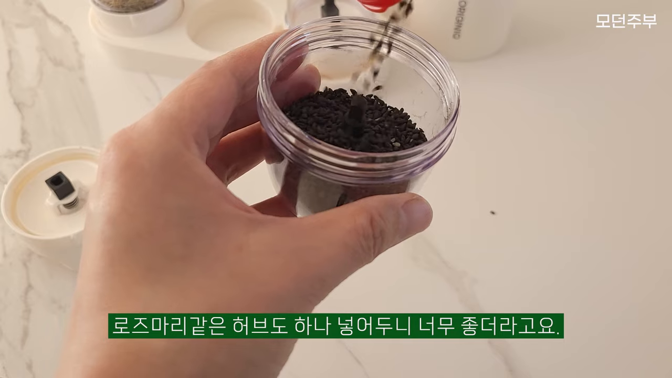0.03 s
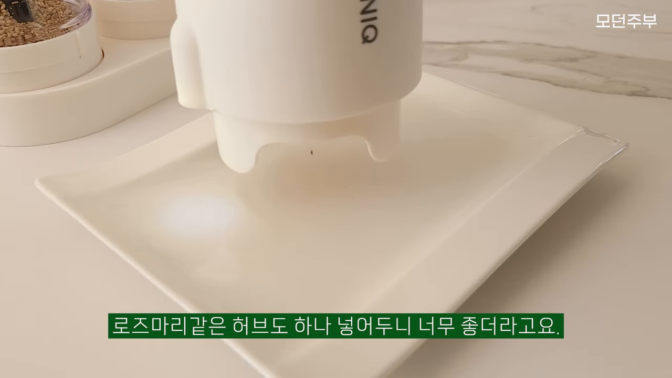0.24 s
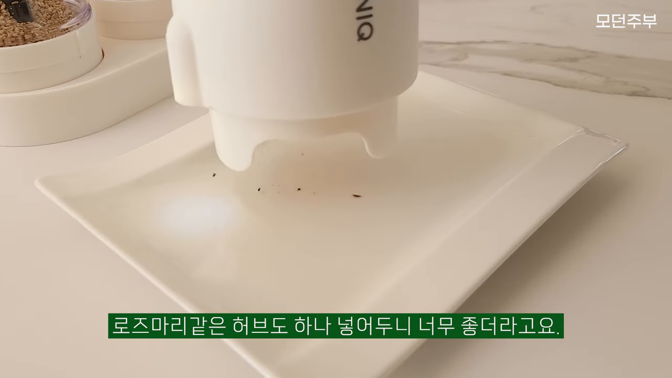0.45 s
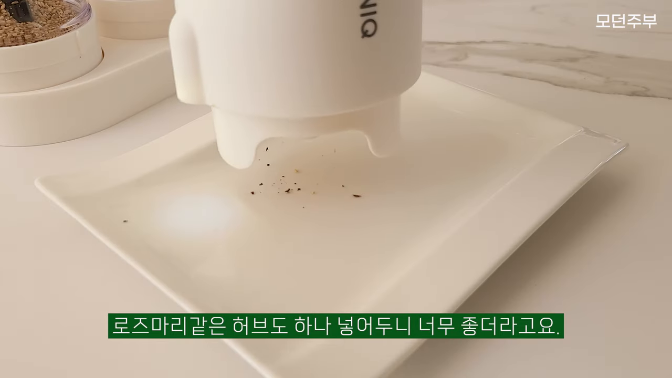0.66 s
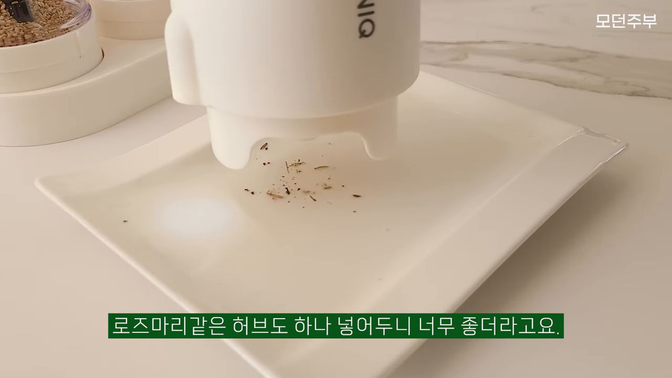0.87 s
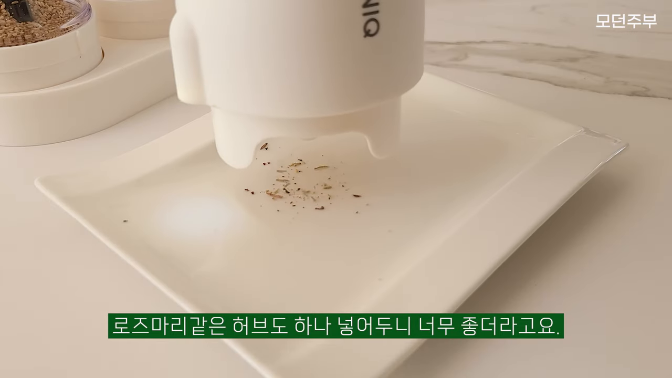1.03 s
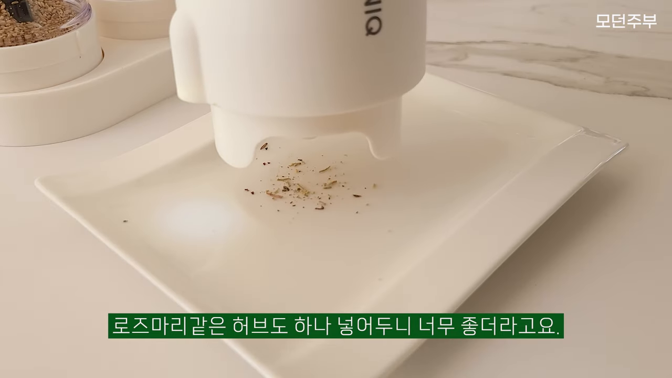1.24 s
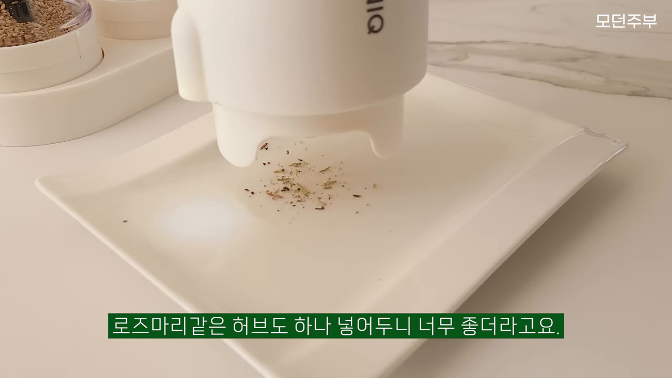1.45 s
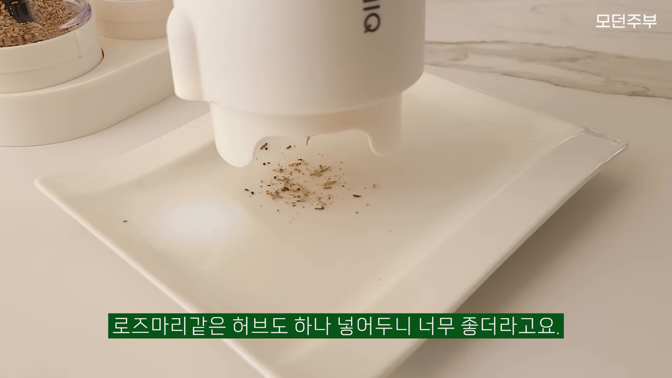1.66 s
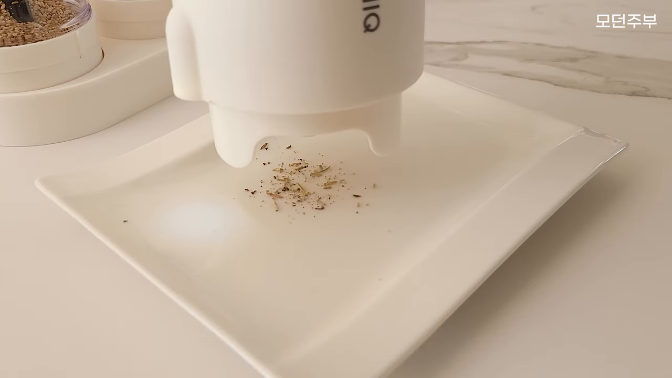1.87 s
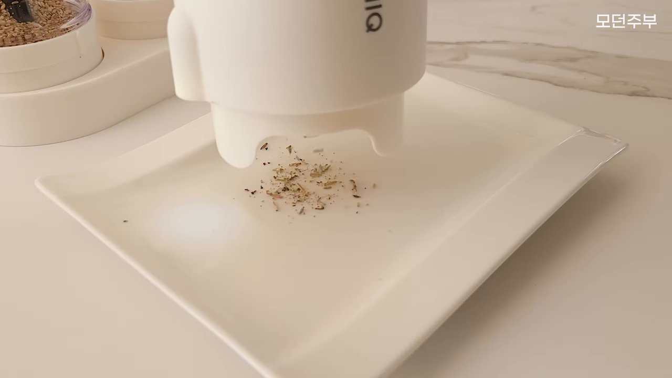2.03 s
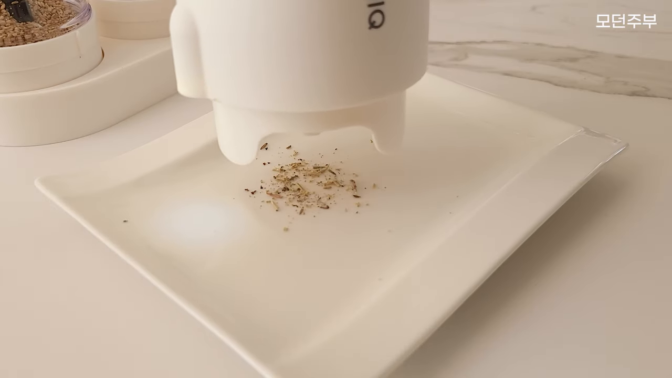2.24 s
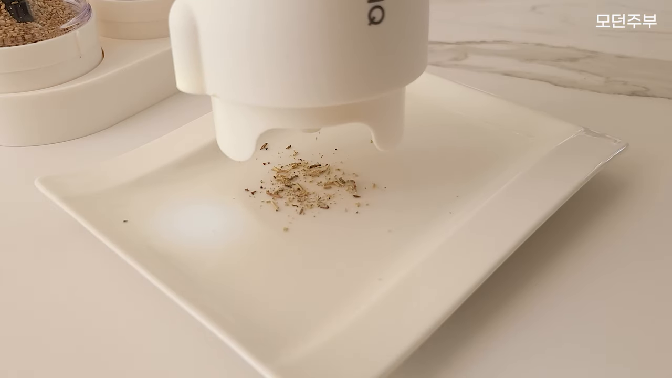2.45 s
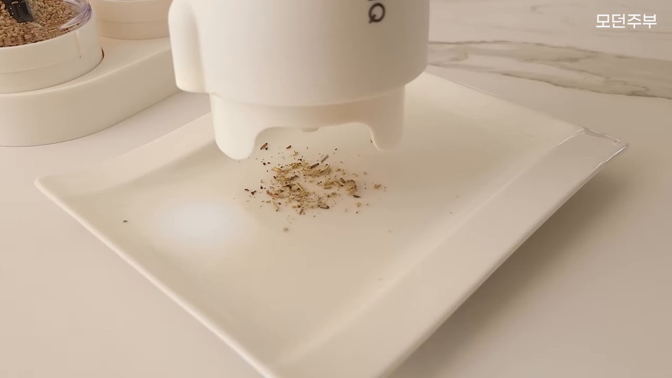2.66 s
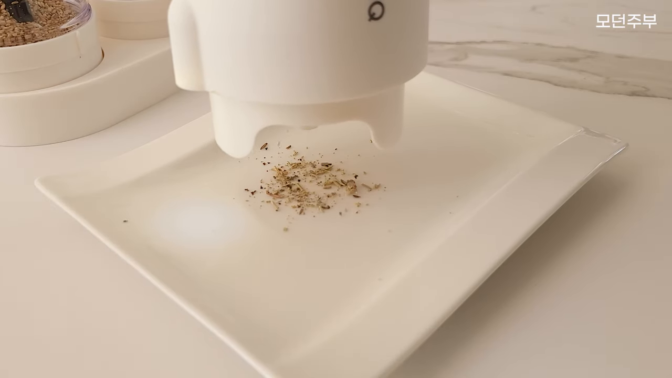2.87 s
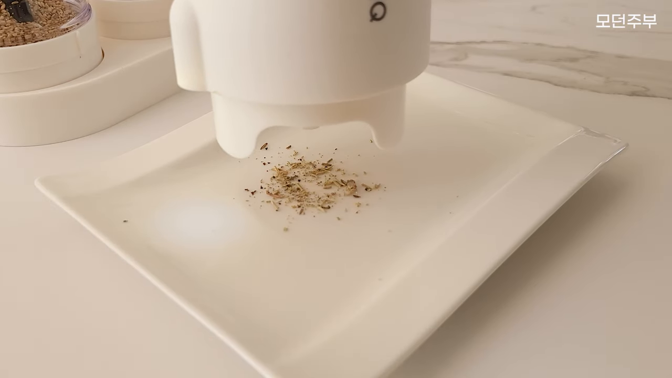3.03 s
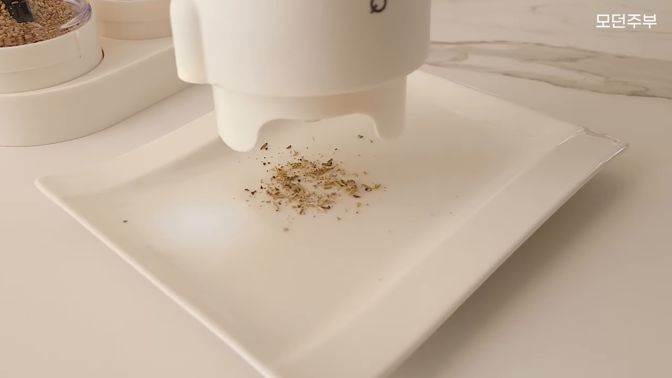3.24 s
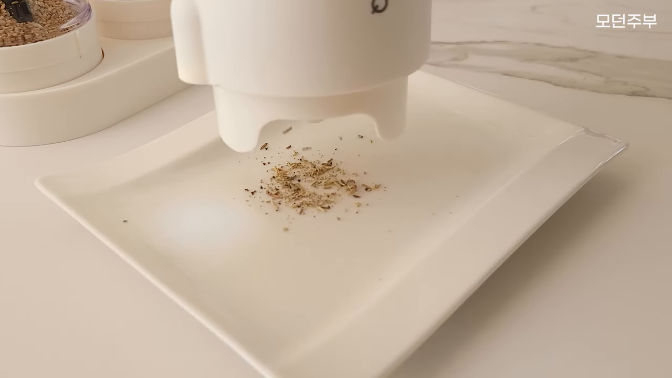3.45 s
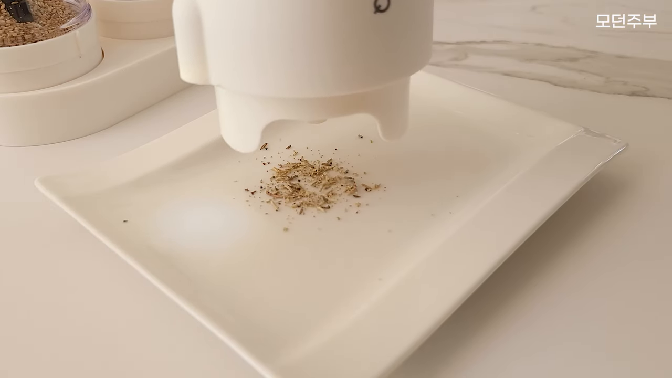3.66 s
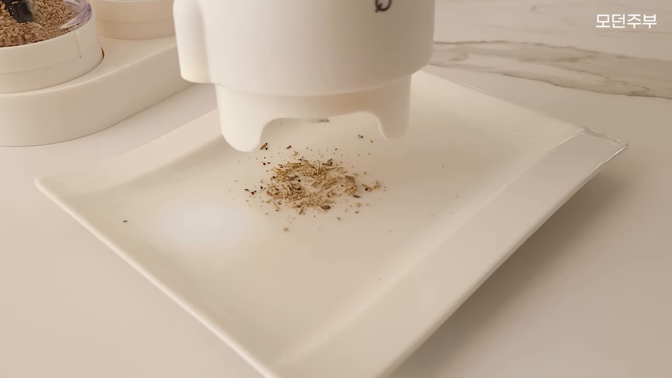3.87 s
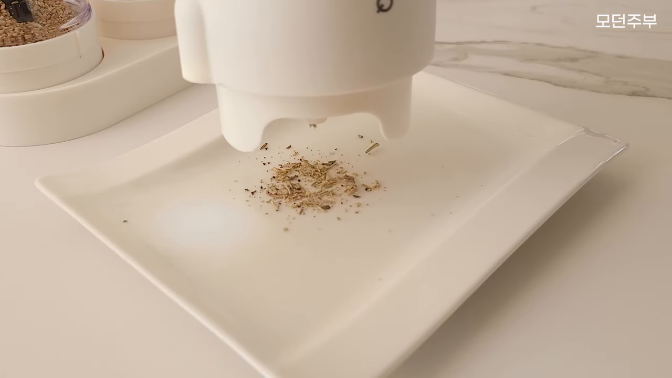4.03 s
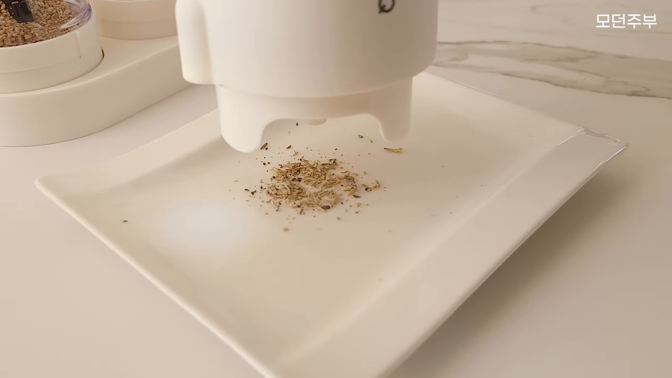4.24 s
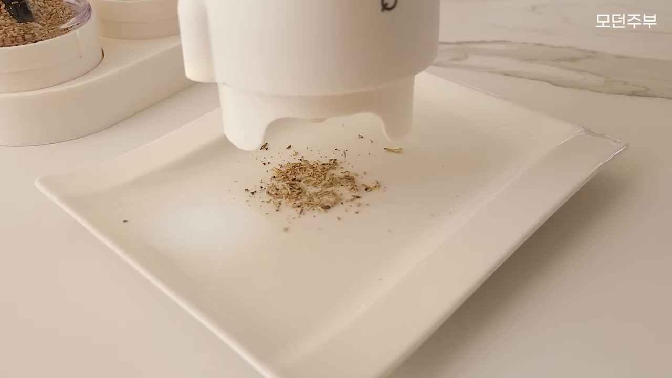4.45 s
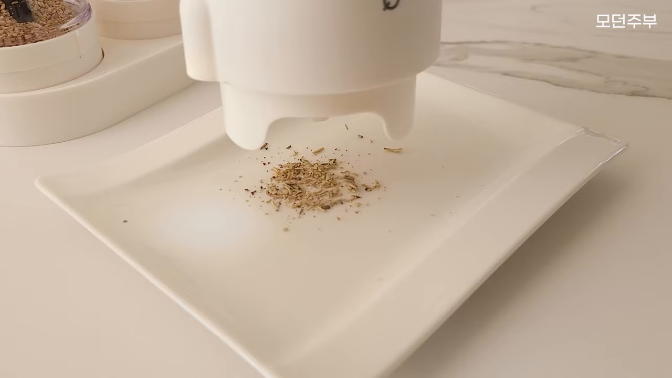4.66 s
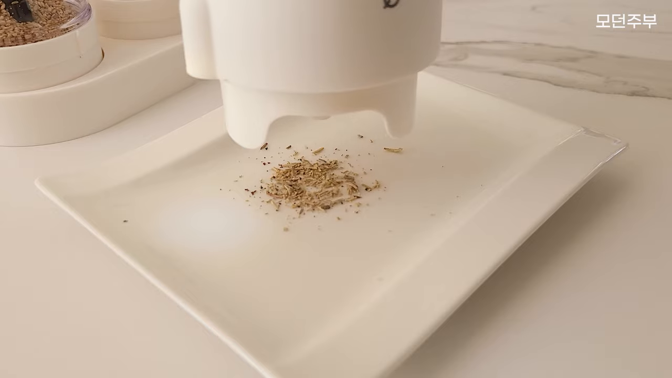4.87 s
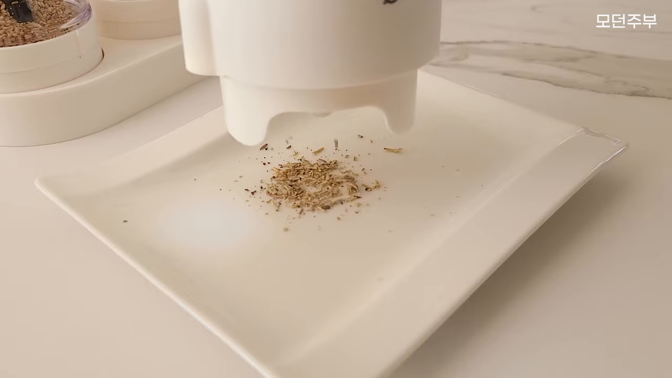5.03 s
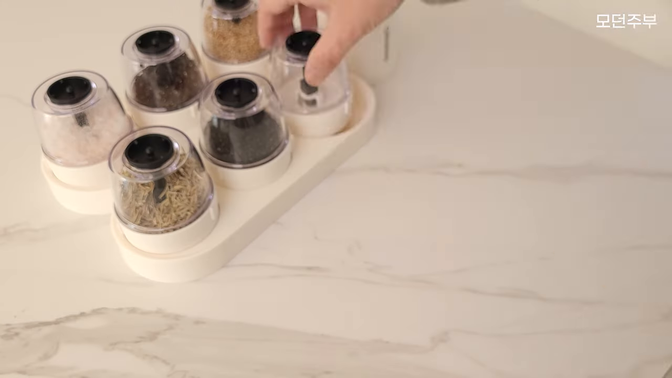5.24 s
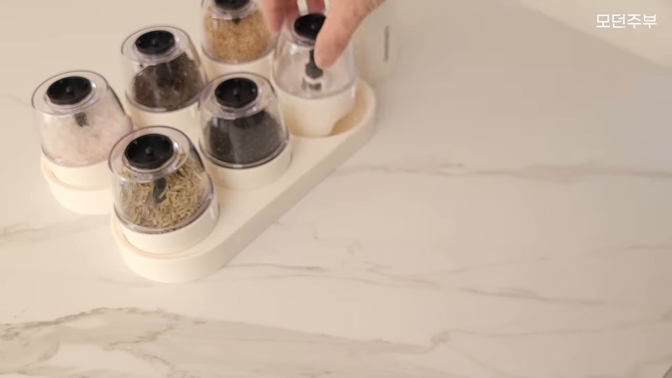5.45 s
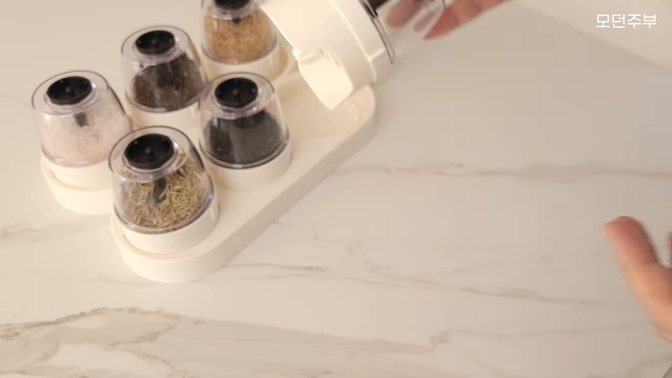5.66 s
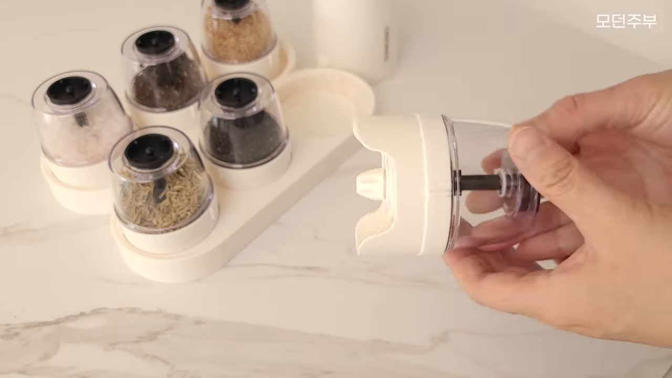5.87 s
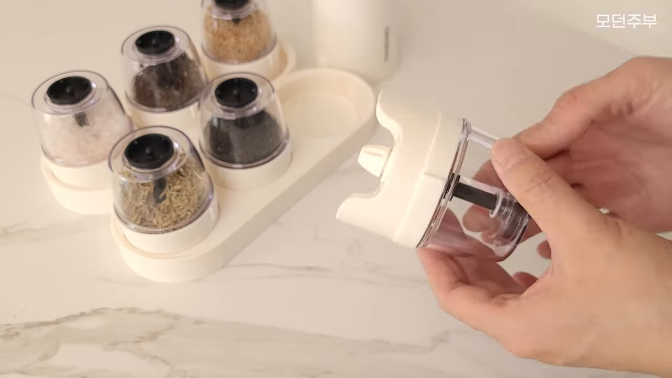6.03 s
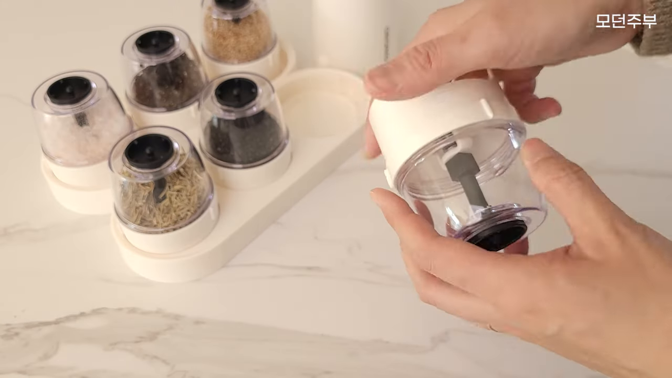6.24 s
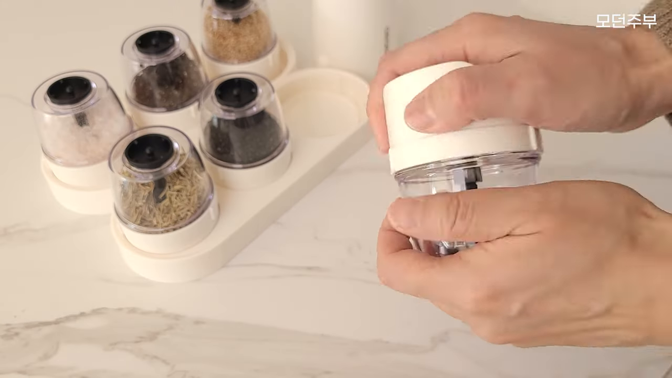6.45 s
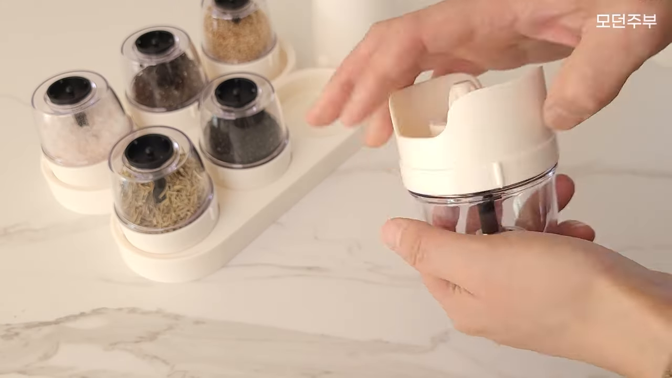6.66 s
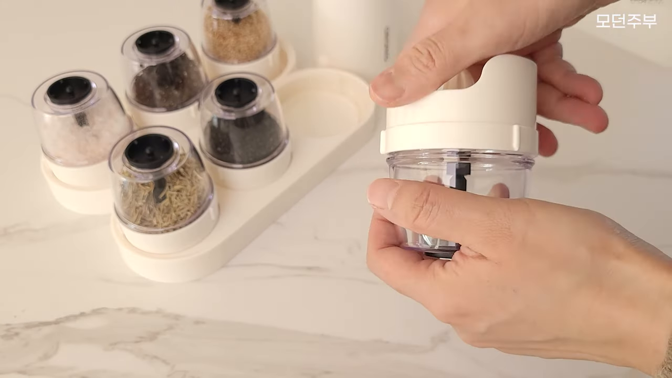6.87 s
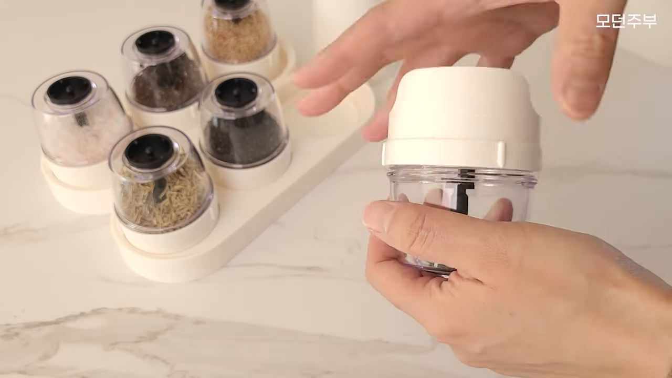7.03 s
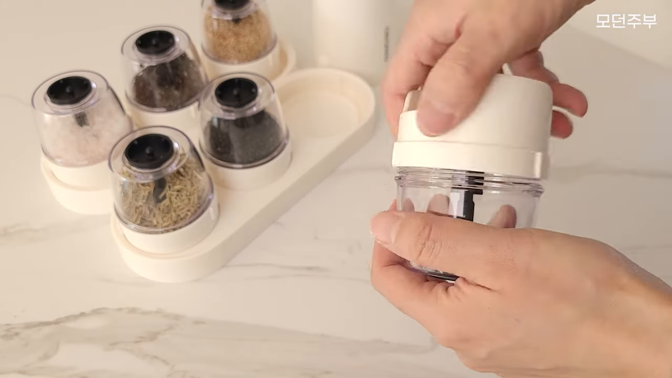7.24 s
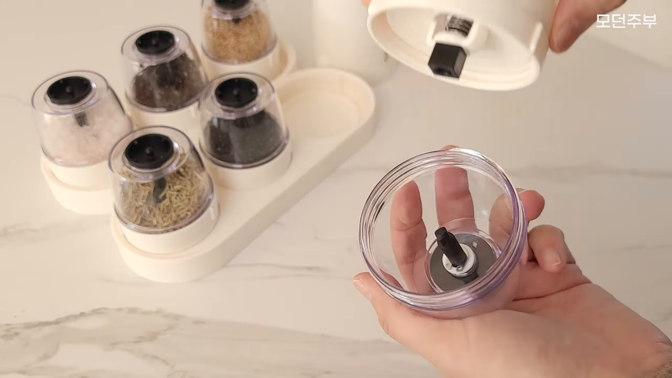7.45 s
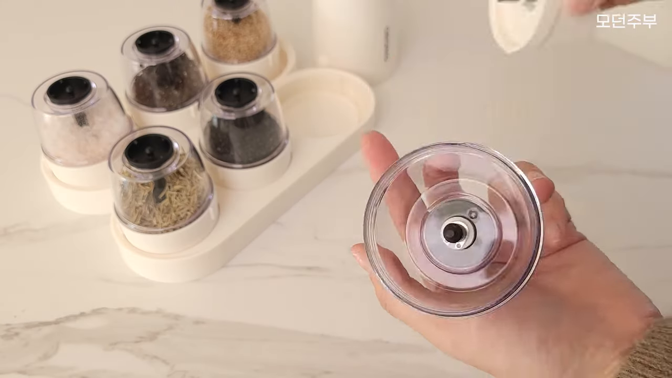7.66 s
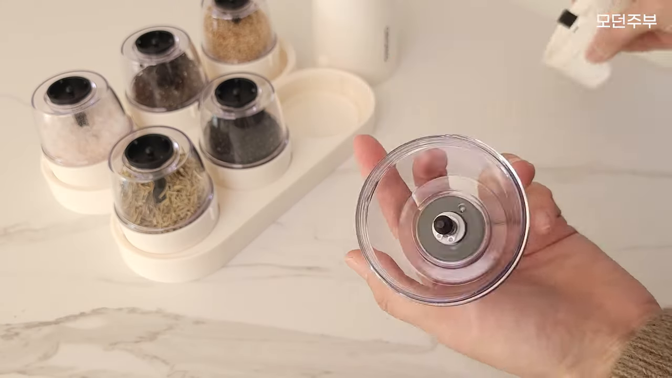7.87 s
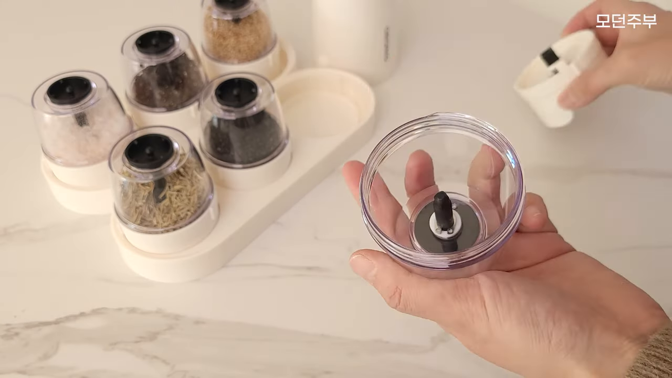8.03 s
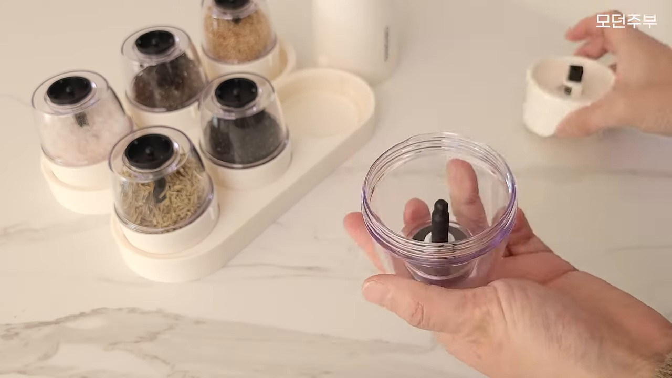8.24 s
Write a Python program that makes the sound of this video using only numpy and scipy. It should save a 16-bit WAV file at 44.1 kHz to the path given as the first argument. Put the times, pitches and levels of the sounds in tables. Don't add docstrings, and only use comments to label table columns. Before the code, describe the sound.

Faint bright seed ticks in a softly humming room give way abruptly to a close battery grinder, its buzzing gear whine wavering as dried herbs load and crack. After about five seconds it cuts out. In a quiet kitchen, a plastic jar knocks out of its tray, hands rub and creak on it, the cap twists and snaps off. Distant appliances rumble low; close stereo microphone.

```python
import sys
import numpy as np
from scipy import signal
from scipy.io import wavfile
from scipy.ndimage import uniform_filter1d

SR = 44100
rng = np.random.default_rng(int(sys.argv[2]) if len(sys.argv) > 2 else 0)


def bounce(signal):
    frames = np.transpose(np.atleast_2d(signal))
    limited = np.clip(frames, -1, 1)
    pcm = np.round(limited * 32767).astype(np.int16)
    wavfile.write(sys.argv[1], SR, pcm)


def convert_level_to_amplitude(level_db):
    exponent = np.asarray(level_db, float) / 20
    return 10 ** exponent


N = 366030
T = np.arange(N) / SR
START_S, STOP_S = 0.225, 5.308


def evened(x):
    return x / np.sqrt(np.mean(abs(x) ** 2) + 1e-20)


def read(points, hz):
    f, value = np.transpose(points)
    return np.interp(np.log(hz + 1), np.log(f + 1), value)


def curves(rows):
    s, *columns = np.transpose(rows)
    return [np.interp(T, s, c) for c in columns]


def wander(width_hz, channels=1):
    pole = [1, -np.exp(-np.pi * width_hz / SR)]
    z = rng.standard_normal((channels, N)) + 1j * rng.standard_normal((channels, N))
    return evened(signal.lfilter([1], pole, signal.lfilter([1], pole, z)))


def noise(colour, same, lead=((1, 0), (2, 0)), pan=((1, 0), (2, 0)), patchy_db=3.5):
    frames, hz = N // 256 + 5, np.fft.rfftfreq(1024, 1 / SR)
    a, b, c, d, patches = rng.standard_normal((frames, 513, 5)).T
    patches = uniform_filter1d(uniform_filter1d(patches, size=10, axis=0), size=10, axis=1)
    like = np.clip(read(same, hz), -1, 1)[:, None]
    left = a + 1j * b
    right = like * left + np.sqrt(1 - like ** 2) * (c + 1j * d)
    right = right * np.exp(-1j * read(lead, hz))[:, None]
    tilt = convert_level_to_amplitude(read(pan, hz) / 2)[:, None]
    level = convert_level_to_amplitude(read(colour, hz)[:, None] + patchy_db * evened(patches))
    z = np.array([left * tilt, right / tilt]) * level
    return evened(signal.istft(z, nperseg=1024, noverlap=768)[1][:, :N])


def ports(z, pan_db, lead_rad):
    left, right = convert_level_to_amplitude(pan_db / 2) * np.exp(1j * lead_rad), convert_level_to_amplitude(-pan_db / 2)
    return np.sqrt(2) * (z * np.array([[left], [right]])).real


def between(start_s, end_s, edge_s=0.00059):
    return np.clip((T - start_s) / edge_s, 0, 1) * np.clip((end_s - T) / edge_s, 0, 1)


def swell(start_s, peak_s, end_s, full=1.0):
    return np.sin(np.pi / 2 * np.interp(T, [start_s, peak_s, end_s], [0, 1, 0])) ** (2 * full)


def bump(start_s, peak_s, end_s, db, fall_db, flat=1.4):
    away = np.interp(T, [2 * start_s - peak_s, peak_s, 2 * end_s - peak_s], [2, 0, 2])
    return np.reshape(db, (-1, 1)) - fall_db * away ** flat


# [pitch_hz, likeness]
ROOM_SAME = [(60, 0.98), (180, 0.99), (550, 0.76), (1650, 0.27), (4970, 0.8), (15000, 0.95)]
# [pitch_hz, level_db_per_hz]
FIRST_ROOM = [(15, -44), (25, -14), (102, -7), (153, -26), (263, -9), (818, -18), (1160, -25.5),
              (1650, -26), (2300, -42), (3100, -41), (3900, -30), (5730, -44.5), (7000, -29), (7950, -24),
              (9000, -31.5), (16000, -29)]
# [pitch_hz, level_db]
HUM = [(99.5, -61.5), (272, -67)]


def first_room():
    air = convert_level_to_amplitude(-58) * noise(FIRST_ROOM, ROOM_SAME)
    hum = sum(np.sqrt(2) * convert_level_to_amplitude(db) * np.sin(2 * np.pi * hz * T) for hz, db in HUM)
    return (air + hum) * between(-1, START_S)


# [pitch_hz, level_db_per_hz]
KITCHEN_AIR = [(15, -48), (25, -15), (49, -15.5), (210, -9.5), (366, -7.5), (533, -23), (609, -13),
               (680, -20), (5000, -42), (6500, -84.5), (11000, -120)]
# [pitch_hz, level_db_per_hz]
SELF_NOISE = [(2350, -37), (4000, -23), (4890, -22.5), (7570, -14.5), (9580, -13), (10800, -10),
              (11900, -5.5), (15800, -6.5)]
# [start_s, peak_s, end_s, level_db]
DRAUGHT = (7.45, 7.4, 8, 3.9)


def kitchen_air():
    wake_s, asleep_db, awake_db = 3.1, -2, 1
    level_db = np.where(T < wake_s, asleep_db, awake_db)
    level_db = np.maximum(level_db, bump(*DRAUGHT, fall_db=2.8)[0])
    air = convert_level_to_amplitude(-61.5 + level_db) * noise(KITCHEN_AIR, ROOM_SAME, patchy_db=2.0)
    hiss = convert_level_to_amplitude(-61) * noise(SELF_NOISE, ROOM_SAME, patchy_db=.6)
    return (air + hiss) * between(START_S, 9)


# [start_s, peak_s, end_s, drone_db, rumble_db]
SURGES = [
    (-.1, .09, 0.23, -66, -66),
    (3.2, 3.7, 3.9, -62, -69),
    (3.8, 4.39, 4.6, -63.5, -70),
    (4.6, 5.13, 5.3, -61.5, -63.5),
    (5.3, 5.45, 5.7, -55, -58),
    (5.7, 5.865, 6, -60, -49),
    (5.85, 5.98, 6.43, -55, -60.5),
    (7.0, 7.4, 7.1, -60, -73),
    (7.68, 7.97, 7.8, -58, -62.5),
]


def appliances():
    surges = [bump(*row[:3], row[3:], fall_db=12) for row in SURGES]
    idle_db = np.array([[-73.5], [-85.5]]) + 5.8 * (T > STOP_S)
    drone_db, rumble_db = np.maximum(np.max(surges, axis=0), idle_db)
    drone = convert_level_to_amplitude(drone_db) * np.exp(2j * np.pi * 59.5 * T) * evened(1 + 0.39 * wander(21)[0])
    rumble = convert_level_to_amplitude(rumble_db) * np.exp(2j * np.pi * 135 * T) * wander(90)[0]
    return np.sqrt(2) * (drone + rumble).real


# [start_s, level_db]
SEEDS = [(0.0084, -53), (0.0154, -46), (0.0254, -45), (0.0424, -50), (0.0508, -46), (0.0752, -47),
         (0.1062, -48), (0.1123, -46), (0.1521, -44), (0.17, -47), (0.1974, -47)]
# [pitch_hz, width_hz, share]
SEED_RING = (7700, 590, 1)


def seeds():
    t60_s, trim_db, low_edge_hz = 0.014, -6, 7240
    out, t = np.zeros((2, N)), np.arange(600) / SR
    common = rng.standard_normal((len(SEEDS), 1, 600))
    puffs = common + 2.2 * rng.standard_normal((len(SEEDS), 2, 600))
    for (s, db), puff in zip(SEEDS, puffs):
        out[:, round(s * SR):][:, :600] += convert_level_to_amplitude(db + trim_db - 60 * t / t60_s) * puff
    hz, width_hz, share = SEED_RING
    out = out + share * signal.lfilter(*signal.iirpeak(hz, hz / width_hz, SR), out)
    return signal.lfilter(*signal.butter(4, low_edge_hz, "high", fs=SR), out)


# [start_s, peak_s, end_s]
WHISPER = (5.3, 6.4, 6.7)
# [pitch_hz, width_hz, level_db]
WHISPER_BAND = (6750, 550, -72.5)


def sleeve():
    hz, width_hz, db = WHISPER_BAND
    band = np.exp(2j * np.pi * hz * T) * wander(width_hz)[0]
    return convert_level_to_amplitude(db) * swell(*WHISPER, full=.3) * np.sqrt(2) * band.real


# [start_s, peak_s, end_s]
THUMP = (5.821, 5.845, 5.874)


def tray_thump():
    return convert_level_to_amplitude(-41.5) * swell(*THUMP, full=0.23) * np.sqrt(2) * np.sin(2 * np.pi * 145 * T)


# [start_s, length_s, drag_db, scrape_db, rub_db]
SLIDES = [(5.42, 0.093, -52, -52, -53.5), (5.69, 0.15, -45.5, -59.5, -53), (5.76, 0.13, -49.5, -60, -50.5),
          (5.86, 0.082, -56.5, -70, -60), (5.9, 0.22, -58.5, -80, -64.5), (6.03, 0.2, -57, -78, -58.5),
          (6.29, 0.07, -71, -72, -61.5), (6.54, 0.1, -58, -57.5, -58), (6.6, 0.13, -60, -58.5, -58.5),
          (6.92, 0.089, -63, -60, -62), (6.96, .11, -56.5, -55, -56)]
# [start_s, length_s, drag_db, scrape_db, rub_db]
SHIVERS = [
    (5.355, 0.14, -55, -57, -68),
    (5.465, 0.16, -56.5, -62.5, -57.5),
    (6.452, 0.097, -55, -55.5, -56),
    (7.272, 0.28, -54.5, -57, -53.5),
    (7.369, 0.038, -48, -43, -47),
    (7.385, 0.16, -57, -59, -58),
]


def strokes():
    held_db = (-68.5, -80, -71)
    level_db = np.reshape(held_db, (-1, 1)) * np.ones(N)
    for rows, peak, flat in ((SLIDES, 0.48, 2.8), (SHIVERS, 0.044, 1.25)):
        for s, length_s, *db in rows:
            stroke_db = bump(s, s + peak * length_s, s + length_s, db, 14.5, flat)
            level_db = np.maximum(level_db, stroke_db)
    return level_db


# [pitch_hz, width_hz, level_db]
DRAG = [(378, 97, -1.5), (594, 280, -3.5), (878, 600, -12.5), (241, 91, -9.5)]
# [pitch_hz, width_hz, level_db]
SCRAPE = [(2030, 430, 1), (2780, 710, -1.5), (1750, 830, -5), (4100, 3500, 0)]
# [pitch_hz, width_hz, level_db]
TRAY = [(1226, 540, -2), (1860, 680, -1.5), (2900, 820, -11.5)]
# [pitch_hz, level_db_per_hz]
RUB = [(1760, -35), (3000, -17), (3400, -9), (5900, -2.5), (6800, 2.5), (7700, -1), (9200, -1), (11600, 2),
       (16000, -5.5)]


def hands():
    drag_db, scrape_db, rub_db = strokes()
    grain = evened(convert_level_to_amplitude(3.6 * wander(170)[0].real))
    bent_s = np.cumsum(1 + .025 * wander(6)[0].real) / SR

    def body(modes):
        out = 0
        for hz, width_hz, db in modes:
            tone = np.exp(2j * np.pi * hz * bent_s) * wander(width_hz)[0]
            out = out + convert_level_to_amplitude(db) * ports(tone, 0, hz / 4000)
        return evened(out)

    twisting = between(6.28, 7.1, .02)
    plastic = twisting * body(SCRAPE) + (1 - twisting) * body(TRAY)
    skin = noise(RUB, [(3000, 0.76), (15000, 0.8)], patchy_db=-0.2)
    moving = convert_level_to_amplitude(drag_db) * body(DRAG)
    moving = moving + grain * convert_level_to_amplitude(scrape_db) * plastic + np.sqrt(grain) * convert_level_to_amplitude(rub_db) * skin
    return moving * between(5.33, 7.54, 0.037)


# [start_s, length_s,
# pitch_hz, level_db]
CREAKS = [(5.706, 0.084, 404, -48), (5.747, 0.034, 723, -55), (5.74, 0.038, 960, -55),
          (5.738, .03, 1280, -60), (5.82, .05, 820, -59), (5.857, 0.028, 344, -52.5),
          (5.886, 0.047, 343, -49.5), (5.966, 0.16, 372, -53), (6.091, 0.085, 351, -52.5),
          (6.315, 0.027, 2050, -74), (6.355, 0.025, 1980, -65), (6.46, 0.13, 1820, -71),
          (6.607, 0.041, 2860, -62), (6.632, 0.038, 2090, -60), (6.652, 0.013, 501, -51.5),
          (6.928, 0.045, 2190, -60), (6.996, 0.04, 2120, -58), (7.0, 0.032, 2900, -67),
          (7.391, 0.0092, 1290, -40), (7.383, 0.011, 1060, -41), (6.05, .04, 2020, -77),
          (5.441, 0.03, 412, -53), (6.94, 0.019, 470, -56.5)]


def creaks():
    roughness, sharpness = 0.67, 10
    out, shakes = np.zeros(N), rng.standard_normal((len(CREAKS), 2, SR // 8))
    for (s, length_s, hz, db), (a, b) in zip(CREAKS, shakes):
        t = np.arange(min(round(length_s * SR), len(a))) / SR
        slow = signal.butter(2, hz / sharpness, fs=SR)
        shake = evened(signal.lfilter(*slow, a + 1j * b))[-len(t):]
        tone = np.exp(2j * np.pi * hz * t) * (1 + roughness * shake)
        tone = tone * np.sqrt(np.sin(np.pi * t / length_s))
        out[round(s * SR):][:len(t)] += np.sqrt(2) * convert_level_to_amplitude(db) * tone.real
    return out


# [time_s, pitch_hz, level_db]
SQUEAKS = [
    [(7.14, 11350, -72), (7.158, 11760, -63), (7.175, 11900, -59), (7.2, 11500, -66), (7.225, 11170, -65),
     (7.27, 11340, -63), (7.335, 11500, -63), (7.37, 11450, -74)],
    [(7.585, 11000, -76), (7.605, 10800, -69), (7.645, 10500, -78)],
    [(7.68, 10750, -80), (7.715, 10870, -78), (7.77, 10450, -77), (7.81, 10100, -80), (7.835, 10020, -77),
     (7.87, 9750, -78)],
]


def squeak():
    out, shake = 0, wander(60)[0]
    for rows in SQUEAKS:
        hz, db = curves(rows)
        tone = np.exp(2j * np.pi * np.cumsum(hz) / SR) * (1 + 0.58 * shake)
        out = out + np.sqrt(2) * convert_level_to_amplitude(db) * tone.real * between(rows[0][0], rows[-1][0], .005)
    return out


# [start_s, peak_db, body_hz, crack_db, rim_hz]
TAPS = [(5.36, -35.5, 1090, -49, 3830), (5.3774, -33, 1240, -51.5, 3850), (5.4668, -33, 2160, -45.5, 4170),
        (5.6748, -57, 1030, -60.5, 7000), (5.8245, -48, 1430, -64, 6800), (6.4519, -33, 2050, -41.5, 4100),
        (6.6396, -42, 2090, -62, 5420), (6.6566, -62, 2300, -66, 6220), (7.2728, -38, 1725, -47, 4000),
        (7.3772, -24.5, 1140, -32.5, 4580), (7.391, -40, 1230, -58, 4470), (7.5096, -55, 1230, -61, 6360),
        (8.198, -66, 1092, -70, 6100), (8.271, -60, 1330, -73, 6200)]
# [pitch_hz, level_db, t60_s]
JAR = [(463, 2, 0.019), (568, 3, 0.031)]
# [factor_on_body_hz, level_db]
SHELL = [(1., 6.5), (1.2, -11), (1.45, 0.5), (2.1, 2.5), (2.8, -8), (.75, -5.5)]
# [level_db_re_crack, t60_s]
RIM = (-2.7, 0.013)
# [start_s, pitch_hz, level_db, t60_s]
SNAPS = [(7.2733, 1750, -28, 0.011), (7.2733, 4160, -45, 0.016), (7.3776, 3020, -25.5, 0.011),
         (7.3776, 2030, -28.5, 0.012), (7.3795, 1260, -30, 0.022), (7.3795, 4500, -36, 0.013),
         (7.382, 1000, -35, 0.025), (7.3795, 1650, -28, 0.018), (7.38, 9400, -35, .008),
         (7.3776, 12400, -40, .008), (7.381, 4470, -48, .06), (7.41, 4800, -55, .04),
         (7.379, 6210, -34, 0.018), (6.4529, 4100, -34.5, 0.016), (6.4575, 1720, -40, 0.023),
         (6.64, 2800, -43, 0.018), (5.3635, 3680, -43, 0.022), (5.3635, 1520, -39, 0.022),
         (5.4645, 1990, -38, .012), (5.468, 8400, -38, .012), (5.468, 10100, -41, .012),
         (5.826, 3600, -47, .015), (5.826, 4500, -47, .015), (6.642, 517, -40, 0.032),
         (7.2735, 8100, -44, .012), (7.2735, 9550, -50, .012), (6.4529, 6800, -39, .014),
         (6.484, 1500, -48, .015), (6.556, 2300, -56, .012), (7.5094, 6300, -50, 0.034),
         (8.198, 5100, -58, .025), (8.198, 6300, -55, .025), (8.2724, 1320, -48, 0.02),
         (8.2724, 6200, -60, .03)]


def taps():
    size = 4000
    out, t = np.zeros((2, N + size)), np.arange(size) / SR
    high = signal.butter(2, 2100, "high", fs=SR)
    dull = signal.butter(1, 7050, fs=SR)

    def ring(hz, db, t60_s):
        return convert_level_to_amplitude(db - 60 * t / t60_s) * np.sin(2 * np.pi * hz * t)

    def shell_at(body_hz, detune):
        return sum(ring(body_hz * f * e, db, 0.041 / f ** 0.61) for (f, db), e in zip(SHELL, detune))

    hollow = sum(ring(*mode) for mode in JAR)
    crack_fall = convert_level_to_amplitude(-60 * t / 0.04) + convert_level_to_amplitude(-9.5 - 60 * t / 0.056)
    spread = rng.uniform(0.884, 1.087, (len(TAPS), 2, len(SHELL)))
    for (s, db, body_hz, crack_db, rim_hz), off in zip(TAPS, spread):
        right_off = 0.6 * off[0] + 0.235 * off[1]
        shell = np.array([shell_at(body_hz, off[0]), shell_at(body_hz, right_off)])
        crack = signal.lfilter(*high, rng.standard_normal((2, size)))
        crack = signal.lfilter(*dull, crack) * crack_fall
        crack += ring(rim_hz, *RIM) + ring(1.04 * rim_hz, *RIM)
        hollow_db = min(db - 7, -48.5) + 4
        knock = convert_level_to_amplitude(db - 8.5) * shell + convert_level_to_amplitude(hollow_db) * hollow + convert_level_to_amplitude(crack_db + 7.5) * crack
        out[:, round(s * SR):][:, :size] += knock * np.minimum(t / 0.00077, 1)
    for s, hz, db, t60_s in SNAPS:
        out[:, round(s * SR):][:, :size] += ring(hz, db, t60_s)
    return out[:, :N]


# [pitch_hz, t60_s]
KITCHEN = [(300, 0.26), (1000, 0.51), (3000, 0.3), (9000, 0.28)]


def kitchen(x):
    echoes = np.zeros((2, SR // 2))
    slots = np.arange(200, SR // 2 - 20, 20)
    at = slots + rng.integers(0, 20, (2, len(slots)))
    np.put_along_axis(echoes, at, rng.choice([-1., 1.], at.shape), 1)
    hz, t, z = signal.stft(echoes, SR, nperseg=256)
    fall = convert_level_to_amplitude(-60 * t / read(KITCHEN, hz)[:, None])
    tail = signal.istft(z * fall, SR, nperseg=256)[1]
    return signal.fftconvolve(x, tail / np.linalg.norm(tail[0]), axes=1)[:, :N]


# [crack_s, drag_hz, lead_db, side_db, low_db]
BITES = [(0.189, 11, -6.5, 5, 1), (0.381, 13.5, 5.5, 0, 7), (0.443, 4.5, 3, 3, 1.5), (0.577, 4.5, 0, 3, 8),
         (0.683, 6.5, 6, 12, 4.5), (0.752, 7.0, 0, 3, 3.5), (0.901, 3.5, 2.5, 12, -2.5),
         (1.04, 5.5, -0.5, -4, 4.5), (1.162, 2, 0, 1, 0), (1.233, 6.5, 2.5, 0.5, 5.5),
         (1.328, 3.5, 0, 7, 2), (1.411, 2, -2, -9, -2), (1.581, 1.05, -1.5, 1, -1.5),
         (1.703, 9.5, 2, -1, -3), (1.819, 2.5, -1, 6.5, -2), (1.958, 8, 3, 6, 4), (2.1, 5, 1.5, -6, 1.5),
         (2.278, 6.5, -0.5, 10, 1), (2.49, 0.0, -5.5, -15, -1), (2.519, 4, -2, -6, 3.5),
         (2.651, 2.5, -3.5, -8, -6), (2.89, 3, -2.5, -7, 1.5), (3.025, 10.5, 3, 5, 1),
         (3.189, 6.5, 1.5, -2, -2), (3.424, 5.5, 2.5, 2, 2.5), (3.565, 10.5, -1.5, 4, 3),
         (3.773, 3.5, 0.5, -2, 4), (3.839, 6.5, 0.5, 2.5, 2.5), (3.999, 6, -0.5, 8.5, -8),
         (4.104, 2, -2, 3.5, 2), (4.262, 3, -3.5, -10.5, 0), (4.427, 5, 0.5, 6.5, 3),
         (4.515, 5.5, -1, 6, 1), (4.685, 7, 0, -1, -2), (4.897, 3, -2, 13, -4), (4.94, 4, 1.5, 6, 1),
         (4.99, 3, 4, -0.5, 3), (5.125, 8.5, 1.5, -6, -2), (5.374, 10.0, 0, 9, 3)]


def speed():
    free_hz, grip_s, recover_s = 205, .186, .145
    steps = np.arange(0, N + 64, 64)
    crack_s, drag_hz = np.transpose(BITES)[:2]
    since_s = steps[:, None] / SR - crack_s
    build = np.sin(np.pi / 2 * np.clip(1 + since_s / grip_s, 0, 1)) ** 2
    load = build * np.exp(-np.maximum(since_s, 0) / recover_s)
    return np.interp(np.arange(N), steps, free_hz - load @ drag_hz)


MESH = [(0, 1), (0, 3), (0, 4), (0, 5), (0, 9), (0, 10), (0, 12), (0, 18), (15, -1), (16, -1), (15, 0),
        (16, 0), (15, 2), (15, 3), (31, -1), (30, 0), (31, 0), (31, 1), (31, 3), (46, -1), (46, 0), (46, 1),
        (62, -1), (61, 0), (62, 0), (76, 0), (77, 0), (92, 0)]
# [level_db, left_right_db, left_lead_rad]
MESH_SOUND = [(-66, 2.5, 0.3), (-62.5, 4.5, 0.3), (-60.5, -2, 0.2), (-67, 4, 0.5), (-57, 10, -2),
              (-61, -9.5, 0.5), (-63, 8, 1.7), (-63, -1, 1), (-61, -4, 1.9), (-54.5, 0, 0.5),
              (-43, 1.5, 1.43), (-49.5, -2.5, 0.5), (-58, 4, 1.15), (-60, -10, 0.0), (-61, 3.5, 1.5),
              (-43, 6, 1.37), (-36, 5.5, 0.96), (-60.5, 11, 3.2), (-51.5, 1.5, 2.5), (-58.5, 7, 2.5),
              (-54, 5, 0.5), (-61.5, 6.5, -2.5), (-56.5, 6, 0.5), (-48.5, 9, -0.5), (-57, -1, 1.8),
              (-53.5, -10, 1), (-46.5, -7, 3.5), (-50, -15.5, -3.5)]
SEATED_SMEAR = {(31, 0): .33, (30, 0): .8, (15, 0): .5, (0, 1): .3, (0, 3): .4, (0, 4): .7}


def gear_lines(shaft, planet):
    lead_db, side_db, low_db = curves(BITES)[1:]
    side_db = side_db - 2 + 4 * np.minimum(wander(14)[0].real, 1)
    steer_db = {31: lead_db, 30: side_db, 15: low_db, 16: -0.37 * low_db}
    rocking_db = 2.5 * np.sqrt(2) * wander(2, channels=2).real
    flutter = wander(36.3, channels=6)
    out = np.zeros((2, N))
    for k, ((teeth, turns), (db, pan_db, lead_rad)) in enumerate(zip(MESH, MESH_SOUND)):
        swing_db = 0
        if turns == 0 and teeth in steer_db:
            swing_db = steer_db[teeth]
        elif teeth == 0 and turns < 4:
            swing_db = rocking_db[k % 2]
        smear = SEATED_SMEAR.get((teeth, turns), .85)
        tone = np.exp(1j * (teeth * planet + turns * shaft)) * evened(1 + smear * flutter[k % 6])
        out += ports(tone * convert_level_to_amplitude(db + swing_db), pan_db, lead_rad)
    return out


# [planet_order, width_hz, level_db, left_lead_rad]
RATTLE = [(9.1, 30, -57, 0.2), (9.466, 130, -54, 0.1), (15.38, 232, -48, 0.4), (29.57, 186, -42, 1.53),
          (43.8, 160, -63, -4.5), (60.88, 315, -43, 0.44), (76.5, 1300, -41.5, 2.5), (93.6, 860, -44.5, -2),
          (122.8, 240, -47.5, 1.5)]


def rattle(planet):
    out = np.zeros((2, N))
    held = (planet + np.linspace(0, planet[-1], N)) / 2
    for order, width_hz, db, lead_rad in RATTLE:
        both, apart = wander(width_hz, channels=2)
        shake = both + min(0.01 * order, .55) * np.array([[1], [-1]]) * apart
        out += ports(np.exp(1j * order * held) * convert_level_to_amplitude(db) * shake, 0.5, lead_rad)
    return out


# [pitch_hz, level_db_per_hz]
GRIND = [(180, -55), (300, -30), (519, -25.5), (801, -12.5), (1040, -15), (1340, -8), (1580, -11.5),
         (2280, -10), (2610, -4.5), (3400, -6.5), (4830, -8), (5340, -11.5), (5900, -8.5), (10900, -8.5),
         (16000, -15)]
# [pitch_hz, likeness]
GRIND_SAME = [(100, 0.46), (700, 0.94), (1400, 0.34), (3100, 0.36), (6800, 0.38), (9500, 0.12),
              (12200, 0.41), (15000, 0.4)]
# [pitch_hz, lead_rad]
GRIND_LEAD = [(100, 0), (1200, 1), (2200, 1.3), (3800, 3), (5300, 5.9), (6300, 9), (8500, 12), (10000, 14),
              (12200, 18), (14300, 21.5), (16000, 22)]
# [pitch_hz, left_right_db]
GRIND_PAN = [(500, 1), (2700, 2), (5500, -.5), (8500, 5), (11000, 2), (14000, -2.5)]


def grinding_hiss(shaft_hz, shaft, planet):
    usual_hz = shaft_hz[round(START_S * SR):round(STOP_S * SR)].mean()
    load_db = 0.24 * np.clip(usual_hz - shaft_hz, -8, 6)
    beat = 1 + 0.14 * np.cos(shaft) + 0.2 * np.cos(0.33 * shaft) + 0.038 * np.cos(planet)
    beat = beat + 0.12 * wander(32)[0].real
    return convert_level_to_amplitude(-33 + load_db) * beat * noise(GRIND, GRIND_SAME, GRIND_LEAD, GRIND_PAN, patchy_db=1.0)


# [pitch_hz, width_hz, depth_0_1]
DIPS = [(2300, 320, .4), (3380, 330, .45), (3680, 180, .45), (4850, 300, .5), (5850, 200, .4),
        (7550, 280, .55), (9900, 300, .5), (12900, 400, .55), (14100, 300, .5)]


def thinner_bands(x):
    sway = wander(8, channels=2).real
    for k, (hz, width_hz, depth) in enumerate(DIPS):
        moved = np.clip(depth + .27 * sway[k % 2] * (-1) ** (k // 2), 0, .9)
        x = x - moved * signal.lfilter(*signal.iirpeak(hz, hz / width_hz, SR), x)
    return x


def grinder():
    shaft_hz = speed()
    shaft = 2 * np.pi * np.cumsum(shaft_hz + 0.242 * wander(13.0)[0].real) / SR
    planet = shaft / 2.25
    out = gear_lines(shaft, planet) + rattle(planet) + grinding_hiss(shaft_hz, shaft, planet)
    faint_end = convert_level_to_amplitude(-40) * between(STOP_S - .002, STOP_S + .013, .004)
    return thinner_bands(out) * (between(START_S, STOP_S, .0004) + faint_end)


def scene():
    knocks = taps()
    background = first_room() + kitchen_air() + appliances() + seeds()
    handling = sleeve() + tray_thump() + hands() + creaks() + squeak()
    return background + handling + knocks + convert_level_to_amplitude(-10.5) * kitchen(knocks) + grinder()


def masked(x):
    hz, t, z = signal.stft(x, SR, nperseg=1024, noverlap=768)
    power = abs(z.mean(0)) ** 2
    near = uniform_filter1d(uniform_filter1d(power, size=3, axis=0), size=5, axis=1)
    level_db = 10 * np.log10(near + 1e-20)
    around_db = uniform_filter1d(uniform_filter1d(level_db, size=41, axis=0), size=9, axis=1)
    grinding = (t > START_S) & (t < STOP_S - .015)
    empty = (level_db < around_db - 6.6) & (hz[:, None] > 2250) & grinding
    return signal.istft(z * np.where(empty, .05, 1), SR, nperseg=1024, noverlap=768)[1][:, :N]


def top_cut(x):
    return signal.sosfilt(signal.butter(12, 16660, fs=SR, output="sos"), x)


def record(dry):
    thin = signal.lfilter(*signal.butter(2, 42, "high", fs=SR), dry)
    edge = signal.firwin(401, 15750, window=("kaiser", 8), fs=SR)
    limited = signal.oaconvolve(masked(thin), edge[None], "same")
    return top_cut(limited)


dry = scene()
out = record(dry)
bounce(out)
```